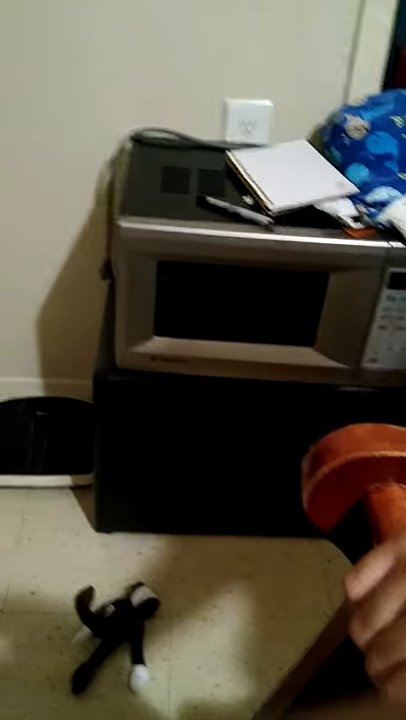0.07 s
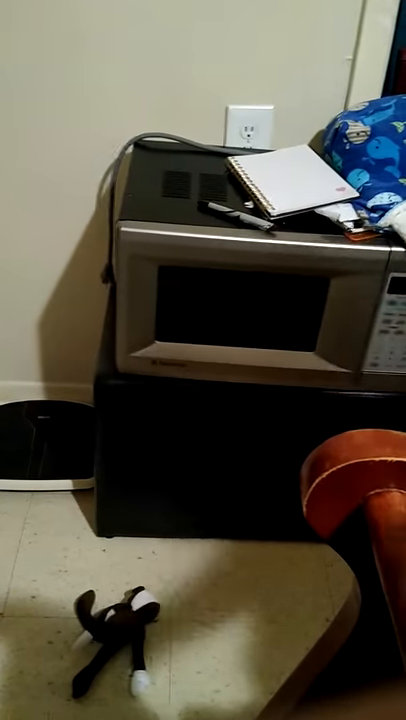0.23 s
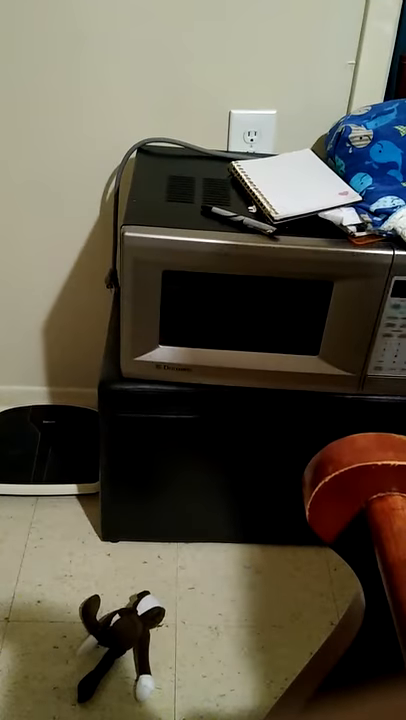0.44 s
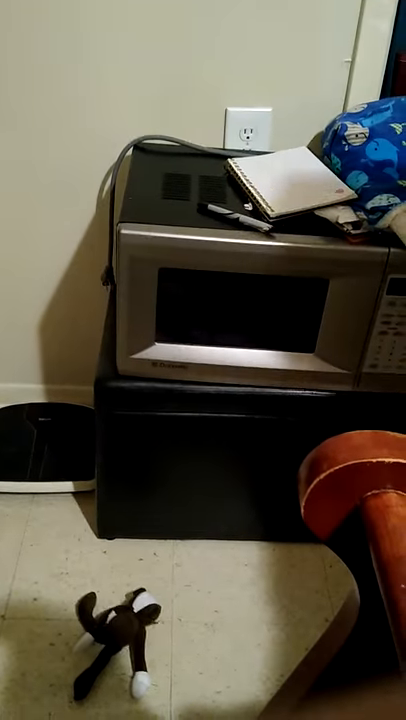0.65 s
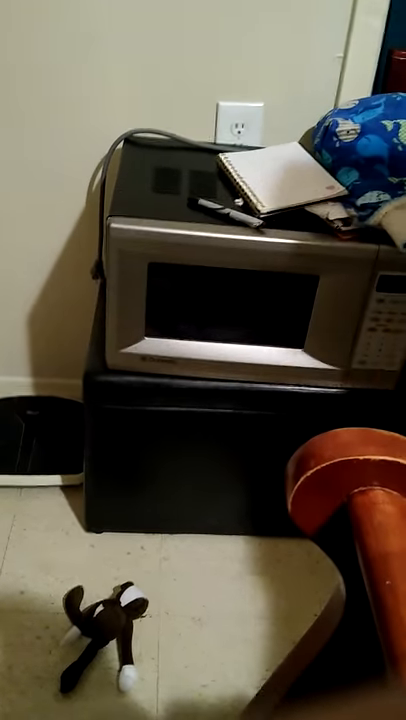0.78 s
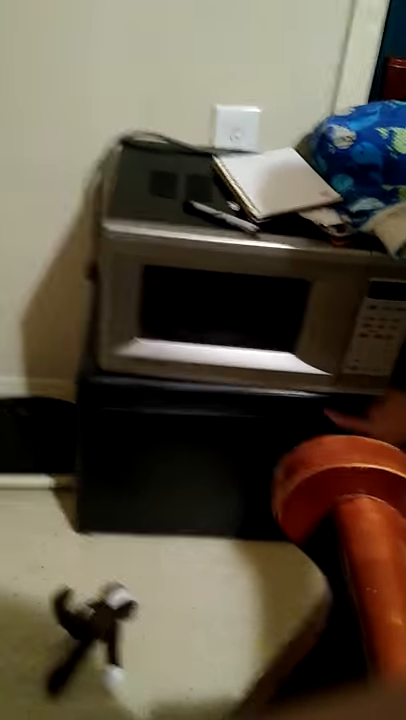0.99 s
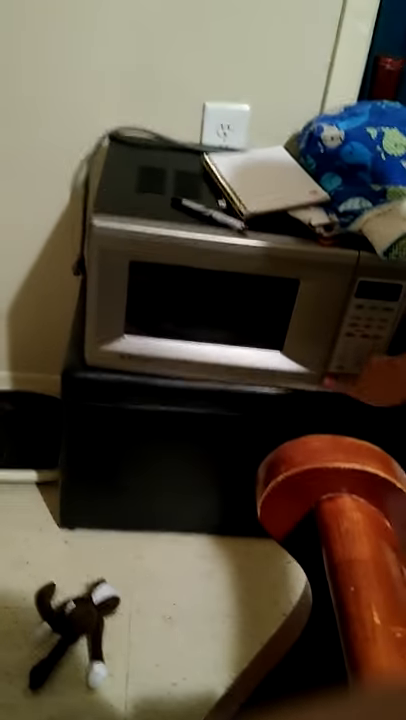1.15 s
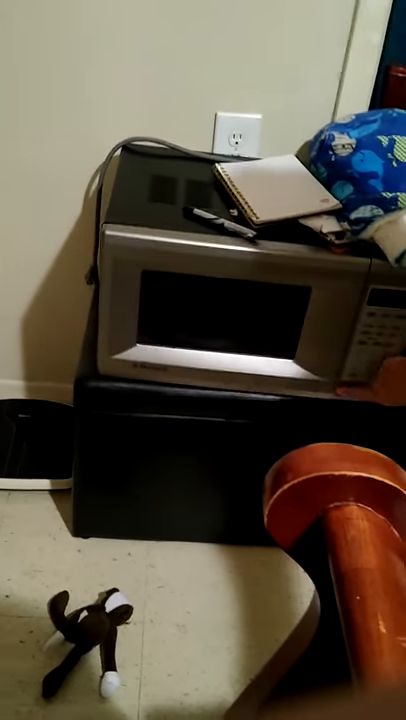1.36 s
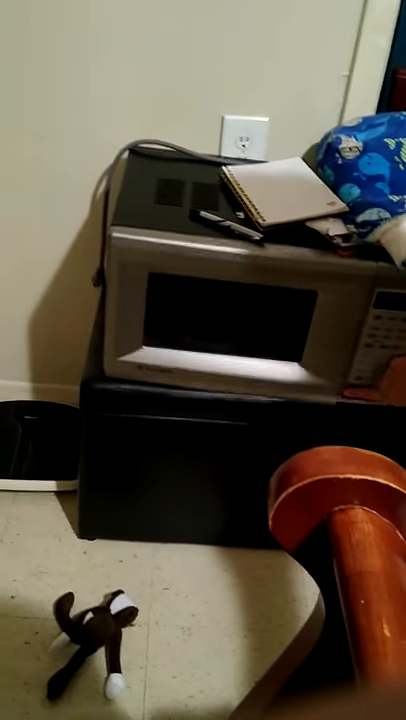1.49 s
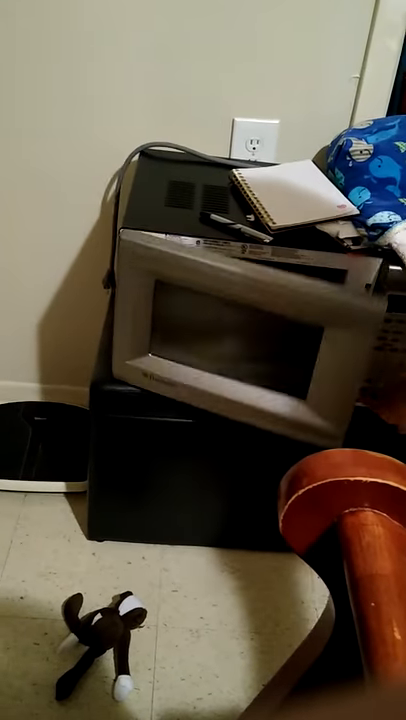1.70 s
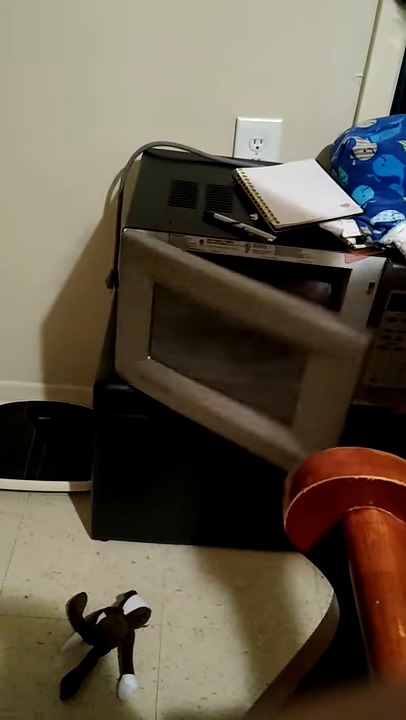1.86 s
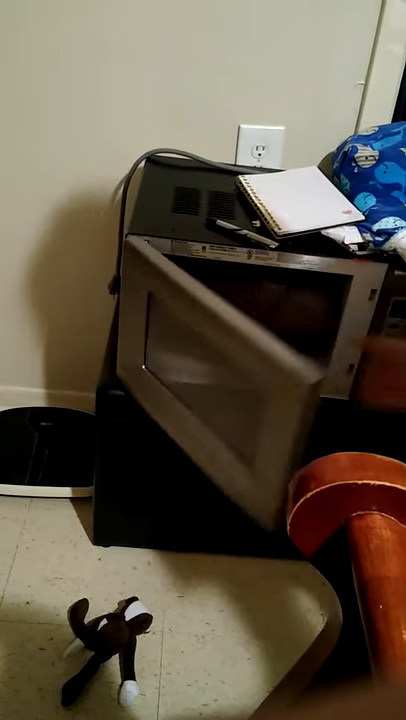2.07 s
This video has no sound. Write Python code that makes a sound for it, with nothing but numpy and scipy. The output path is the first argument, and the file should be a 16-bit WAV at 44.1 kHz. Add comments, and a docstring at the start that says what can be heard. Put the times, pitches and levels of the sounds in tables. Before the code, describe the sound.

A microwave oven door release clicks, then the latch clunks loudly and the door rattles open

```python
"""A quiet kitchen: a hand slides off a chair with a thin hiss and a tick, soft steps thud on the floor,
the release button of a microwave oven clicks, the latch clunks and the steel door swings open, rattling.
Blows are noise bursts with fading sine tones, rubbing is filtered noise, steps are low fading tones.
The hard-walled room rings after every blow; two close microphone ports hear it over room tone and hum."""
import sys
import numpy as np
from scipy import signal
from scipy.fft import rfft, irfft
from scipy.io import wavfile
from scipy.ndimage import uniform_filter1d

SR = 44100
rng = np.random.default_rng(int(sys.argv[2]) if len(sys.argv) > 2 else 0)


def invert_db(x):
    """Field ratio 10**(x/20) for x, a level in decibels (scalar or array-like)."""
    u = np.asarray(x, float) / 20
    return 10 ** u


def to_wav(s):
    """Save 16-bit WAV."""
    ch = np.atleast_2d(s).T  # columns
    pcm = np.round(np.clip(ch, -1, 1) * 32767)  # PCM
    wavfile.write(sys.argv[1], SR, pcm.astype(np.int16))


N = 94197  # length in samples

# Blows of the button, the latch and the swinging door:
# (time [s], crack [dB], brightness [dB per octave], ring [dB], decay time of the burst [s])
BUTTON_BLOWS = [(1.2486, -32, -1, -47, 0.0058), (1.2531, -24, 0, -42.5, 0.0031),
                (1.3271, -31, 5, -54, 0.0054)]
LATCH_BLOWS = [(1.6148, -27, 1, -38, 0.0043), (1.641, -24, -0.5, -34, 0.013),
               (1.6549, -8.5, 3, -24.5, 0.0032), (1.664, -17, 4.5, -33.5, 0.0043),
               (1.699, -36.5, -3, -41, .005)]
DOOR_BLOWS = [(1.913, -42.5, -2, -57, 0.0058), (1.959, -24.5, 2.5, -33.5, 0.0046),
              (2.014, -37, -2, -43.5, 0.015), (2.059, -35, 9, -65, 0.0041),
              (2.104, -39.5, -3.5, -41, 0.026)]
# Tones at which each part rings: (frequency [Hz], relative level [dB], time to fall 60 dB [s])
BUTTON_MODES = [(222, -9, 0.11), (303, 0, 0.11), (383, 3, 0.095), (475, -5.5, 0.11), (860, 3, 0.051),
                (1150, -9, 0.034), (1336, -7, 0.028), (1605, 0.5, 0.034), (1827, -6.5, 0.076),
                (2560, -17, .05), (2700, -20, 0.056)]
CABINET_MODES = [(123.8, -9.5, 0.31), (182, -12, 0.05), (246, -16, 0.14), (311, -5.5, 0.079),
                 (388, -2, 0.087), (451.4, 0.5, 0.054), (540, 0.5, 0.04), (660.5, -6, 0.15),
                 (719, -10.5, 0.17), (814, -3.5, 0.057), (1010, -4.5, 0.043), (1270, -14, 0.053),
                 (3640, 9.5, 0.0085)]
DOOR_MODES = [(181, -9.5, 0.096), (310, -17.5, 0.084), (456, -2.5, 0.11), (640, -19, 0.1), (878, -3, 0.097),
              (1037, -6, 0.041), (1270, -2.5, 0.065), (1470, -7.5, 0.037), (1777, -3, 0.036),
              (2650, -12, 0.061)]
# Colour of plastic on steel: (frequency [Hz], relative level [dB])
CRACK_COLOUR = [(180, -12), (400, -3), (900, -4.5), (2000, -8), (2600, -2), (3100, -9.5), (3700, -5.5),
                (8000, -9), (12000, -6), (14000, -7.5), (16000, -10)]
# Rubbing of the hinge: (time [s], level [dB])
HINGE_LEVEL = [(1.8, -49), (1.9, -68.5), (1.96, -47), (2.05, -54.5), (2.14, -49.5)]
# Soft steps and bumps: (time [s], level [dB], pitch [Hz], scuff relative to the thud's level [dB])
STEP_THUDS = [(0.333, -39, 152, -6.5), (.361, -40.5, 145, -11), (0.4178, -28, 151.6, -12.5),
              (0.938, -35.5, 170, -16), (.978, -36, 166, -21), (1.0709, -34.5, 168, -11.5),
              (1.284, -34, 207, -9), (1.401, -34.5, 159, -8), (2.06, -35, 159, -24), (2.089, -40, 182, -14),
              (2.11, -35, 257, -14)]
# Hand sliding over the chair, and sleeve brushing, before the gain of each port: (time [s], level [dB])
SLIDE_LEVEL = [(0, -82), (.034, -67.5), (.056, -54.5), (.31, -56), (.34, -57), (.37, -61), (.41, -74)]
BRUSH_LEVEL = [(.24, -86), (.27, -64.5), (.32, -79), (.4, -106), (.42, -60.5), (.46, -67.5), (.52, -91.5)]
# Colours of the sliding hand, the sleeve and the tick: (frequency [Hz], relative level [dB])
SLIDE_SPECTRUM = [(1700, -38), (2200, -18), (2700, -47), (7000, -38), (8800, -24), (10300, -22.5),
                  (11900, -7.5), (14200, 0.5), (15700, -21), (16500, -60)]
BRUSH_SPECTRUM = [(2500, -25), (3500, -10), (5000, -7), (7000, 4.5), (10000, 1), (13000, 13.5),
                  (15500, -25), (16500, -42)]
TICK_SPECTRUM = [(1500, -20), (4800, -19), (6500, 0), (8200, -15), (12500, 0), (16000, -28)]
# Appliance hum: (frequency [Hz], level [dB], bandwidth of the wavering [Hz])
HUM_BANDS = [(74, -63.5, 1.5), (123.1, -63.5, 11), (213, -66, 5.4), (521, -65, 2.8)]
# Colour of the room tone: (frequency [Hz], relative level [dB])
AIR_SPECTRUM = [(25, 4), (55, -5.5), (95, -24), (160, -15), (270, -0.5), (470, -2.5), (560, -3.5),
                (700, -8), (900, -7), (1100, -25.5), (1450, -11.5), (1750, -24), (2200, -40.5),
                (8000, -46.5), (15000, -43.5), (16500, -64)]
# Likeness of the room tone at the two ports: (frequency [Hz], likeness [-1 to 1])
AIR_LIKENESS = [(60, 0.53), (180, 1), (550, 0.55), (1650, -0.29), (4970, -0.38), (15000, 0.24)]
# Balance of the room tone: (frequency [Hz], left minus right [dB])
AIR_LEAN = [(60, -1.5), (240, -3), (950, -2), (3770, 2), (15000, -1)]
# How fast the room dies away: (frequency [Hz], time to fall 60 dB [s])
ROOM_T60 = [(100, 0.78), (300, 0.2), (1000, 0.35), (3000, 0.29), (8000, 0.32), (14000, 0.24)]
# Colour of the room's tail: (frequency [Hz], relative level [dB])
TAIL_COLOUR = [(60, -26.5), (200, -2), (500, -0.5), (1000, 0.5), (4000, 2.5), (14000, 2)]
# Likeness of the room's tail at the two ports: (frequency [Hz], likeness [-1 to 1])
TAIL_LIKENESS = [(100, 0.92), (300, 0.93), (600, 0.062), (2000, 0.21), (12000, 0.039)]
# The ports face the oven unevenly: (frequency [Hz], left minus right [dB])
PORT_LEAN = [(60, -5.5), (180, 1.5), (550, -4.5), (1650, 1), (4970, -1), (15000, 3.5)]

OVEN_WET_DB, FLOOR_WET_DB, TICK_WET_DB = 3, 1.5, -13  # room tail against direct sound


def evened(x):
    """Scales to an average strength (rms) of 1."""
    return x / np.sqrt(np.mean(x ** 2) + 1e-20)


def read(points, hz):
    """Reads a table in between its points, over log frequency."""
    f, value = np.transpose(points)
    return np.interp(np.log(hz + 1), np.log(f + 1), value)


def level(points):
    """Turns a dB curve over time into gain, practically silent outside it."""
    s, db = np.transpose(points)
    return invert_db(np.interp(np.arange(N) / SR, s, db, left=-150, right=-150))


def add(mix, s, sound):
    """Mixes a sound in at a time in seconds."""
    part = mix[round(s * SR):][:len(sound)]
    part += sound[:len(part)]


def coloured(x, points, tilt_db=0.):
    """Filters by a spectrum and a tilt in dB per octave about 4 kHz."""
    hz = np.fft.rfftfreq(2 * len(x), 1 / SR)
    gain = invert_db(read(points, hz) + tilt_db * np.log2((hz + 50) / 4000))
    return irfft(rfft(x, 2 * len(x)) * gain)[:len(x)]


def pair(frames, size, likeness, lean):
    """Random short-time spectra for two ports, alike by a set share at each frequency."""
    hz = np.fft.rfftfreq(size, 1 / SR)
    a, b, c, d = rng.standard_normal((frames, len(hz), 4)).T
    same = np.clip(read(likeness, hz), -1, 1)[:, None]
    half_lean = invert_db(read(lean, hz) / 2)[:, None]
    shared, other = a + 1j * b, c + 1j * d
    right = same * shared + np.sqrt(1 - same ** 2) * other
    return hz, np.array([half_lean * shared, right / half_lean])


def room(x, wet_db):
    """Direct sound plus a dense tail of echoes, each band dying at its own speed."""
    frames, hop, port_delay = 300, 128, 4  # the last two in samples
    hz, z = pair(frames, 512, TAIL_LIKENESS, PORT_LEAN)
    t = np.arange(frames) * hop / SR
    fade_db = read(TAIL_COLOUR, hz)[:, None] - 60 * t / read(ROOM_T60, hz)[:, None]
    tail = signal.istft(z * invert_db(fade_db), nperseg=512, noverlap=512 - hop)[1]
    # the tail starts just after the direct sound
    tail = tail * np.clip(np.arange(tail.shape[1]) / SR / 0.00051 - .3, 0, 1)
    tail = tail / np.sqrt((tail ** 2).sum(1).mean())
    wet = signal.fftconvolve(x[None], tail, axes=1)[:, :N]
    left = coloured(x, [(f, db / 2) for f, db in PORT_LEAN])
    right = coloured(x, [(f, -db / 2) for f, db in PORT_LEAN])
    return np.array([left, np.roll(right, port_delay)]) + invert_db(wet_db) * wet


def crack_noise(t, length, tilt_db):
    """Tiny contacts: noise whose strength jumps every 40 samples, in a short fading burst."""
    noise = rng.standard_normal(len(t))
    jumps_db = 3.65 * rng.standard_normal(len(t) // 40 + 1).repeat(40)[:len(t)]
    burst = np.minimum(t / 0.0012, 1) * np.exp(-t / length)
    return evened(coloured(noise * invert_db(jumps_db), CRACK_COLOUR, tilt_db)) * burst


def ringing(t, length, modes):
    """A struck body rings at its own tones; each is a close pair that beats, varied by chance."""
    split = 0.014  # typical pitch gap of a pair, as a share of the pitch
    body = 0
    for hz, db, t60 in modes:
        a, b, c = rng.standard_normal(3)
        first = np.sin(2 * np.pi * hz * t + 1.35 * b)
        second = 0.84 * np.sin(2 * np.pi * hz * (1 + split * c) * t + 1.15 * a)
        body = body + invert_db(db + 1.65 * a - 60 * t / t60) * (first + second)
    swell = 1 - np.exp(-t / (0.14 * length))
    return swell * body


def blow(modes, crack_db, tilt_db, ring_db, length):
    """A bright crack of tiny contacts together with the ringing of the struck body."""
    t = np.arange(round(.4 * SR)) / SR
    crack = crack_noise(t, length, tilt_db)
    return invert_db(crack_db) * crack + invert_db(ring_db) * ringing(t, length, modes)


def struck(modes, blows):
    """Plays a list of blows; each meets the room from a slightly other spot, with a new tail."""
    out = 0
    for s, *rest in blows:
        dry = np.zeros(N)
        add(dry, s, blow(modes, *rest))
        out = out + room(dry, OVEN_WET_DB)
    return out


def hinge():
    """Rough rubbing: noise of slightly uneven strength, swelling and fading in the room."""
    noise = rng.standard_normal(N)
    rough_db = 0.6 * evened(uniform_filter1d(rng.standard_normal(N), 150))
    rub = evened(coloured(noise * invert_db(rough_db), CRACK_COLOUR, -3.1))
    return room(level(HINGE_LEVEL) * rub, OVEN_WET_DB)


def oven():
    """The release button, the latch on the cabinet, the knocking door and its hinge."""
    button = struck(BUTTON_MODES, BUTTON_BLOWS)
    latch = struck(CABINET_MODES, LATCH_BLOWS)
    door = struck(DOOR_MODES, DOOR_BLOWS)
    return button + latch + door + hinge()


def steps():
    """Low pushes on the floor: two fading tones about an octave apart, with a faint scuff of noise."""
    thud_t60 = 0.056  # seconds to fall 60 dB
    scuff_colour = [(200, -35), (600, 20.5), (2000, -7), (5000, -35)]  # (frequency [Hz], level [dB])
    dry, t = np.zeros(N), np.arange(round(.1 * SR)) / SR
    for s, db, hz, scuff_db in STEP_THUDS:
        push = np.sin(2 * np.pi * hz * t) + .5 * np.sin(2 * np.pi * 2.008 * hz * t)
        scuff = invert_db(scuff_db) * evened(coloured(rng.standard_normal(len(t)), scuff_colour))
        fade = invert_db(db - 60 * t / thud_t60) * np.minimum(t / .002, 1)
        add(dry, s, fade * (scuff - push))
    return room(dry, FLOOR_WET_DB)


def finger_tick():
    """The finger snaps free: a very short burst of coloured noise."""
    start_s, tick_db, rise_s = .326, -29, 0.00044
    t, dry = np.arange(1000) / SR, np.zeros(N)
    shape = np.e * t / rise_s * np.exp(-t / rise_s)  # peaks at 1 after rise_s
    noise = evened(coloured(rng.standard_normal(len(t)), TICK_SPECTRUM))
    add(dry, start_s, invert_db(tick_db) * shape * noise)
    return dry


def hand():
    """Fine skin friction and a brushing sleeve, as separate noise at each port, plus the tick."""
    tick = finger_tick()
    rub = []
    for noise in rng.standard_normal((2, N)):
        skin = level(SLIDE_LEVEL) * evened(coloured(noise, SLIDE_SPECTRUM))
        sleeve = level(BRUSH_LEVEL) * evened(coloured(noise[::-1], BRUSH_SPECTRUM))
        rub.append(skin + sleeve)
    port_gain = invert_db([[3.5], [1.5]])  # from dB: left, right
    return np.array(rub) * port_gain + room(tick, TICK_WET_DB)


def air():
    """Room tone: coloured noise whose strength is patchy over time and frequency."""
    air_db, patch_db = -53.5, 3.0
    frames = N // 256 + 5
    hz, z = pair(frames, 1024, AIR_LIKENESS, AIR_LEAN)
    patches = rng.standard_normal((frames, len(hz))).T
    patches = uniform_filter1d(patches, 8, 0)  # smooth over frequency
    patches = evened(uniform_filter1d(patches, 12, 1))  # smooth over time
    spectra = z * invert_db(read(AIR_SPECTRUM, hz)[:, None] + patch_db * patches)
    tone = signal.istft(spectra, nperseg=1024, noverlap=768)[1][:, :N]
    return invert_db(air_db) * evened(tone)


def hum():
    """Appliance hum: each tone is a steady part plus a part that wavers slowly by chance."""
    t, out = np.arange(N) / SR, 0
    for hz, db, width in HUM_BANDS:
        r = np.exp(-np.pi * width / SR)
        slow = signal.lfilter([1], [1, -r], [1, 1j] @ rng.standard_normal((2, N)))
        tone = (np.exp(2j * np.pi * hz * t) * (0.98 + slow / np.std(slow))).real
        out = out + invert_db(db) * evened(tone)
    return out


def scene():
    """All sources at the two ports."""
    return oven() + steps() + hand() + air() + hum()


def band_limit(x):
    """A steep low-pass at the top of the band."""
    return signal.sosfilt(signal.butter(12, 16820, fs=SR, output="sos"), x)


def record(dry):
    """The microphone loses the deep bass, and a steep filter cuts the highest treble."""
    mic_low_hz, edge_hz = 58.6, 15850
    high_pass = signal.butter(4, mic_low_hz, "high", fs=SR, output="sos")
    thin = signal.sosfilt(high_pass, dry)
    low_pass = signal.firwin(511, edge_hz, window=("kaiser", 6), fs=SR)
    cut = signal.oaconvolve(thin, low_pass[None], "same")
    return band_limit(cut)


dry = scene()
out = record(dry)
to_wav(out)
```